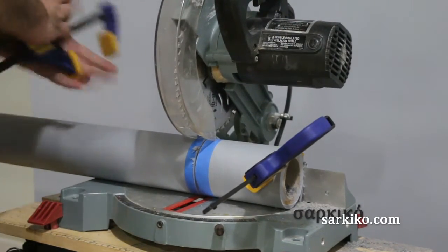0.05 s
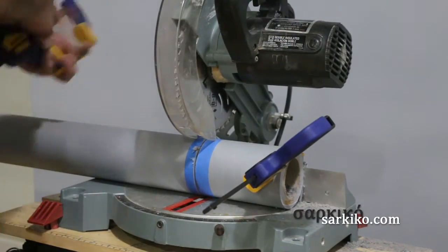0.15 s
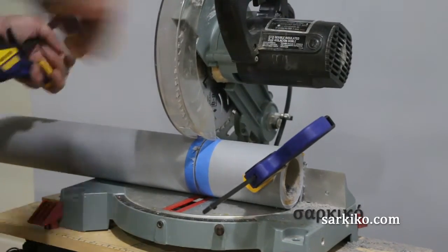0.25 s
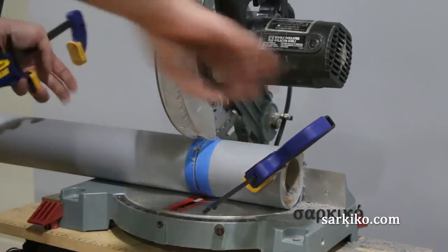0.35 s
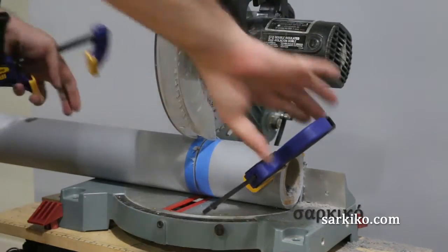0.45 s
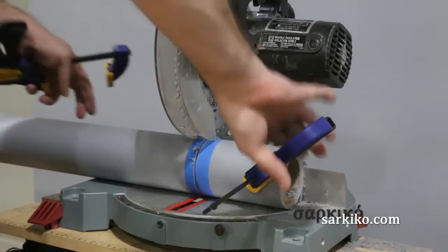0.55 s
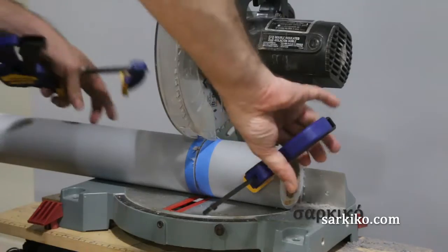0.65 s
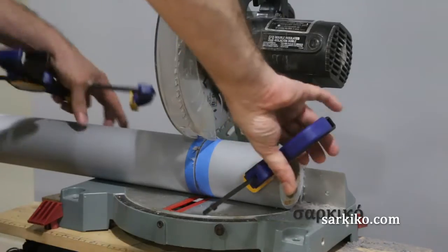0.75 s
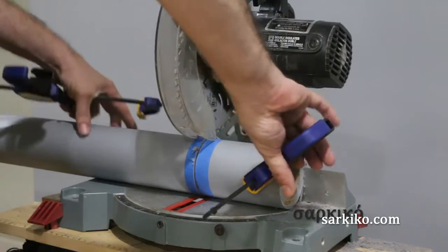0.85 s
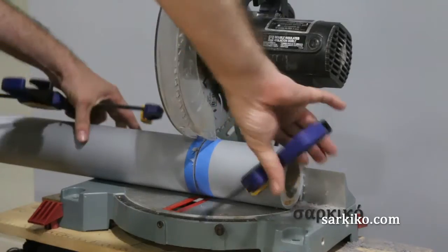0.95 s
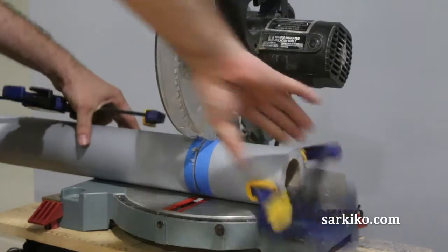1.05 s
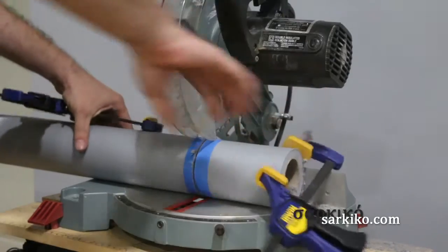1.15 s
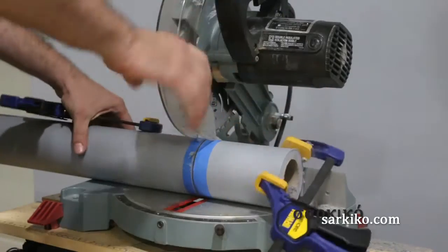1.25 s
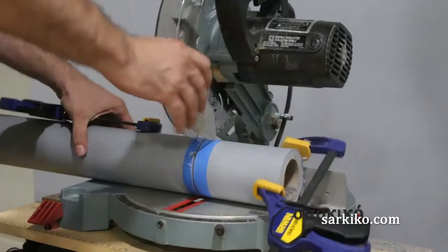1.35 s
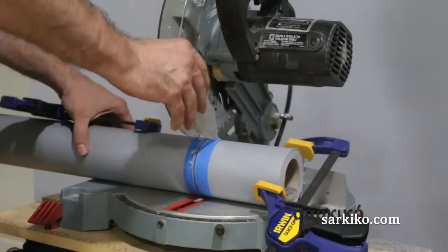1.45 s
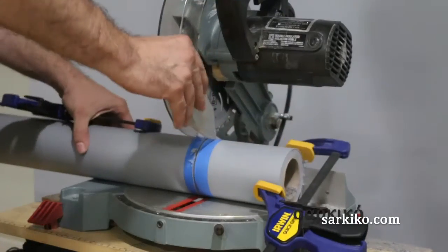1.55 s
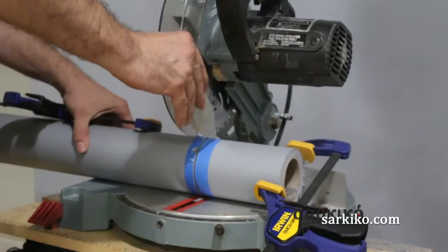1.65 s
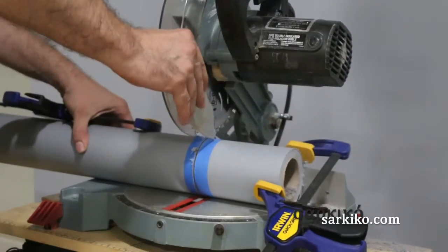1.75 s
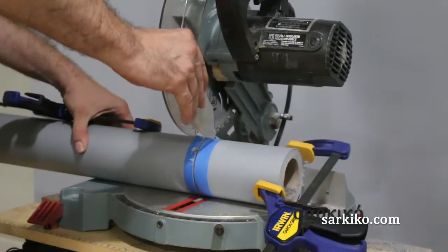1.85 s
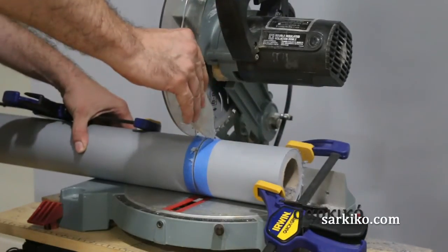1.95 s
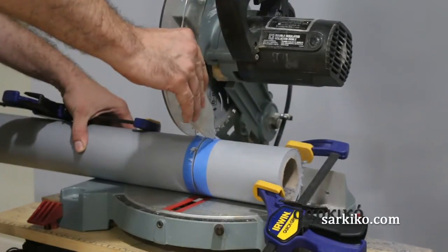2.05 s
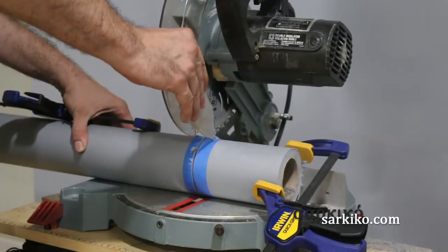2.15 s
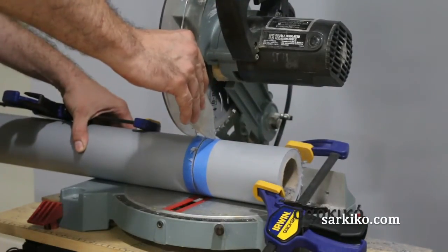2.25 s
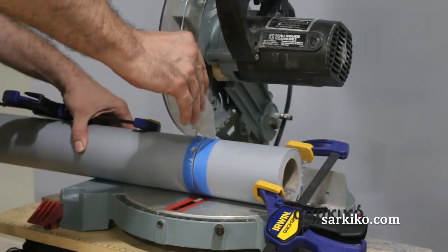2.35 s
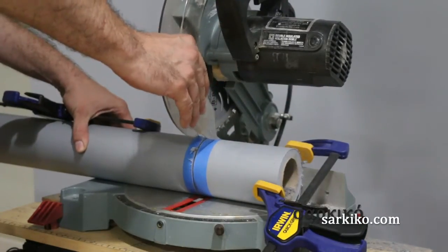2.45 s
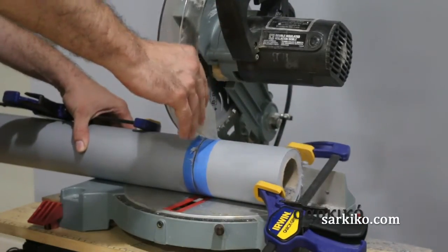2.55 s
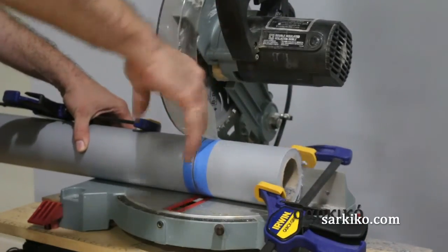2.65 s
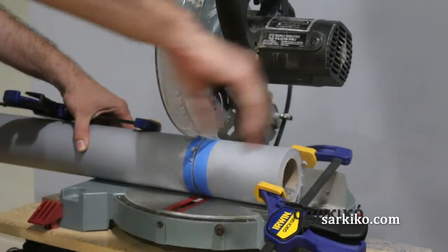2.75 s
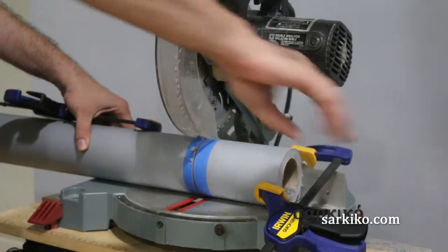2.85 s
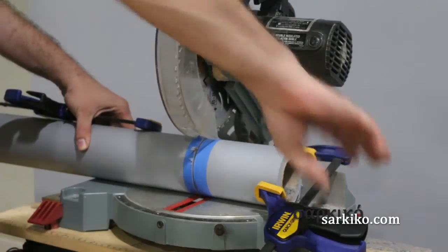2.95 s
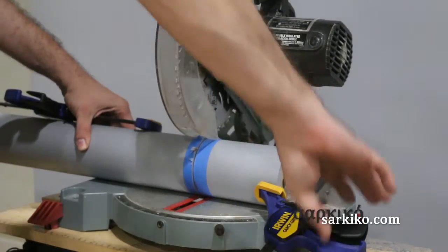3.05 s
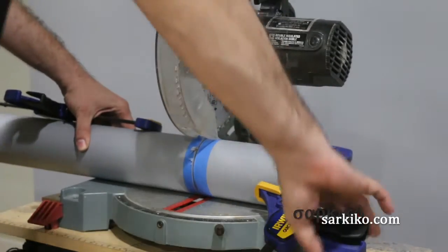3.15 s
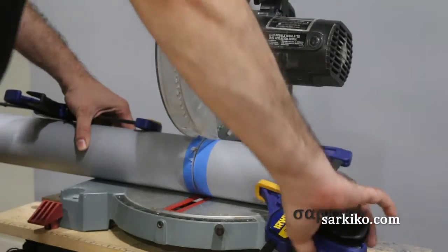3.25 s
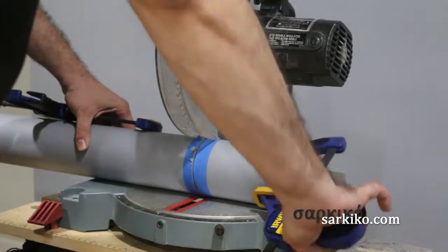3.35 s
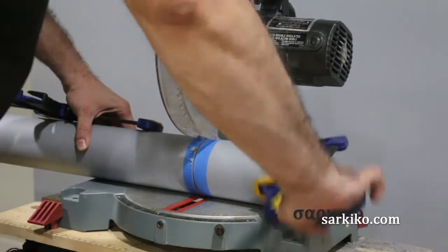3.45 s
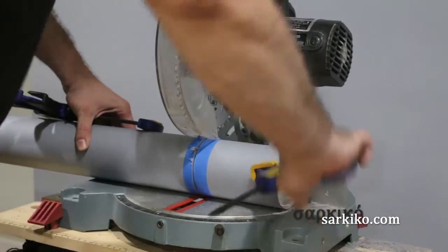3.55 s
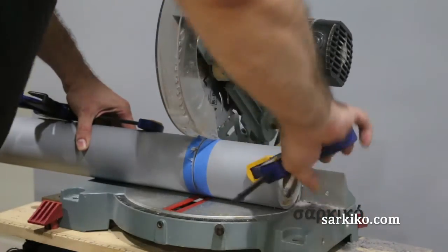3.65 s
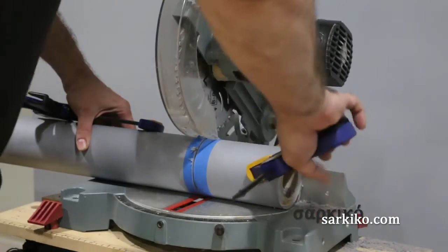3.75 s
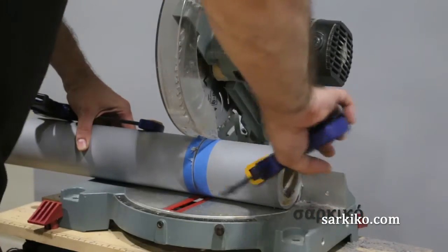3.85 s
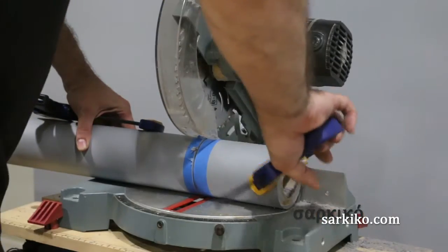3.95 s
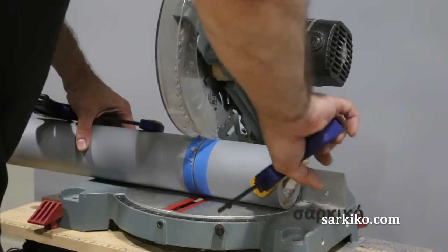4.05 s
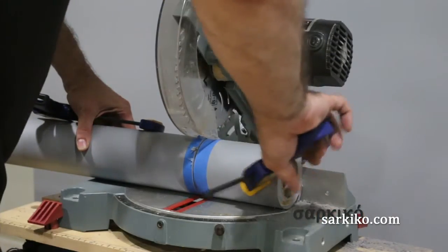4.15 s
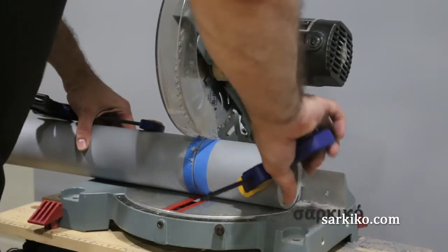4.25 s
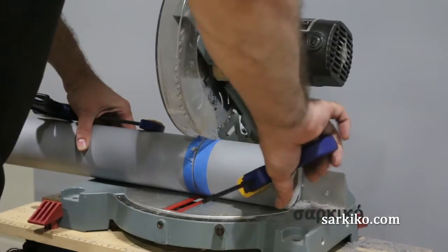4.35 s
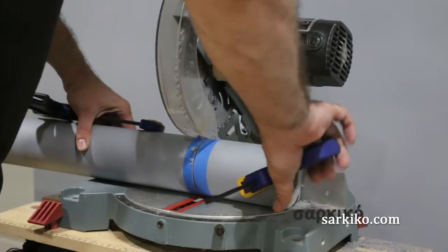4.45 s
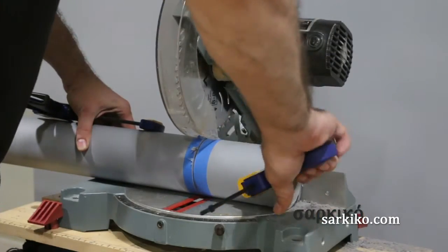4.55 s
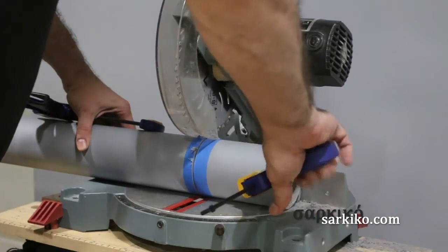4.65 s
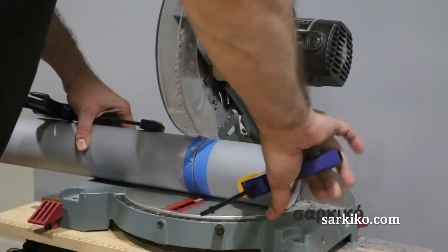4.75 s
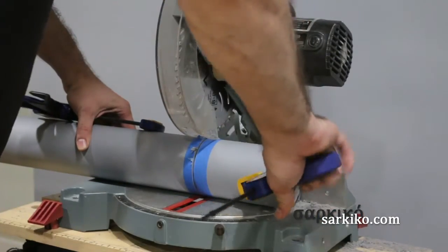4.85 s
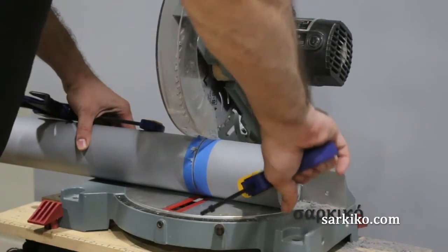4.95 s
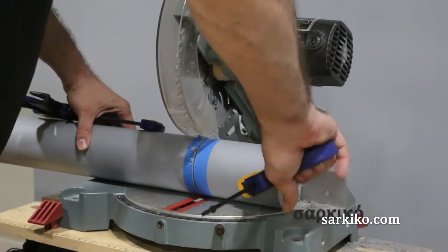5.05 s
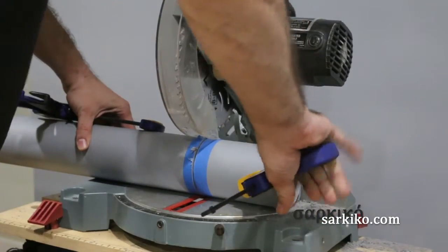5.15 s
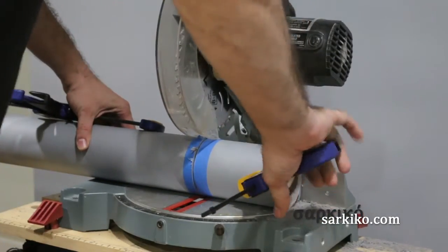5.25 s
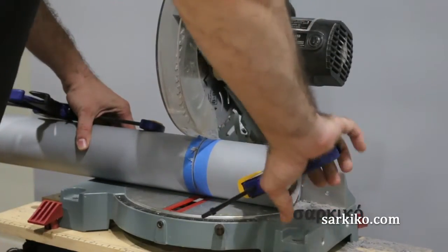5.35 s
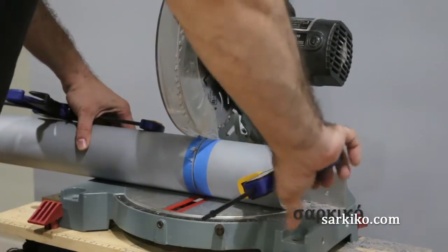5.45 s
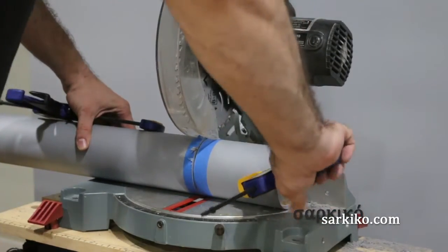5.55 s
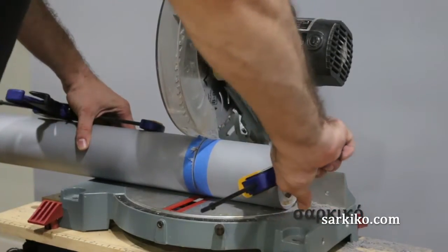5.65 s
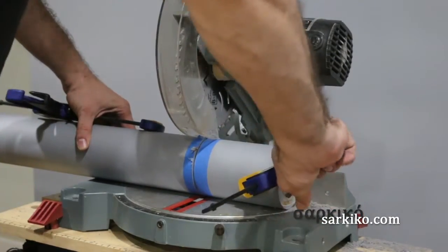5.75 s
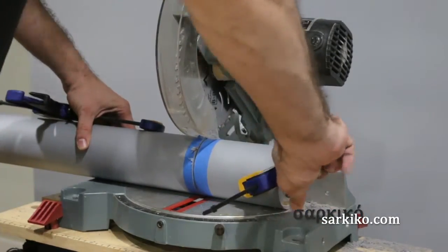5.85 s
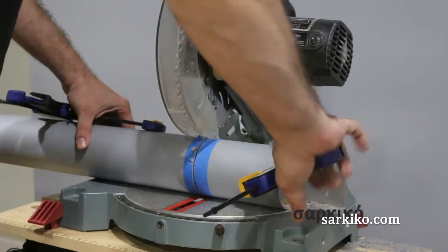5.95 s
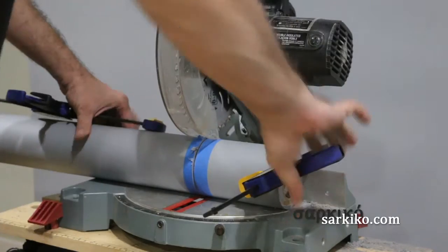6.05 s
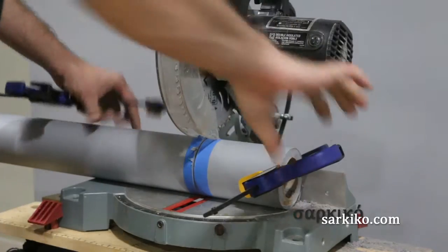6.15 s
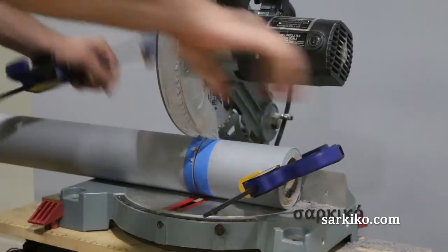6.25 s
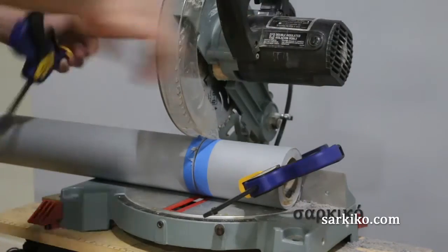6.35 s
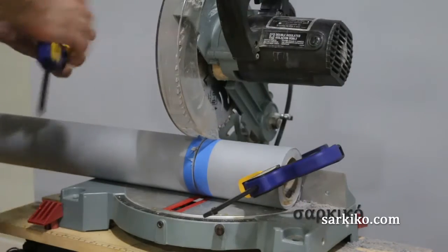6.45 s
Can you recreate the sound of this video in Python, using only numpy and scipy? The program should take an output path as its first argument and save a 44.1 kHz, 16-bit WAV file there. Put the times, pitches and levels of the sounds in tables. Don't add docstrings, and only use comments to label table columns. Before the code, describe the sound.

Close view of hands working plastic bar clamps on a hollow pipe. Light knocks come first, then a double clack and a loud clattering drop with fast bounces. Near silence holds with faint ticks, until jaws scrape and click again, one bright metallic snap bursts out, and softer ratchety clacks follow. The room is hard and lively, with soft steady background noise.

```python
import sys
import numpy as np
from scipy import signal
from scipy.fft import rfft, irfft
from scipy.io import wavfile

SR = 44100
rng = np.random.default_rng(int(sys.argv[2]) if len(sys.argv) > 2 else 0)


def boost_factor(decibels):
    exponent = np.asarray(decibels, float) / 20
    return 10 ** exponent


def transcribe(signal):
    frames = np.atleast_2d(signal).T
    limited = np.clip(frames, -1, 1)
    pcm = np.round(limited * 32767).astype(np.int16)
    wavfile.write(sys.argv[1], SR, pcm)


N = 285971

# start in seconds, peak level in dB, ring frequency in Hz,
# ring level in dB, crack level in dB.
KNOCKS = [(0.071, -28.5, 2200, -6, -2.5), (0.136, -24.5, 2530, 1.5, -9), (0.482, -26, 2620, -13, -9),
          (0.792, -12.5, 1526, -1, -10), (0.8198, -13, 2886, -5, -10.5), (1.077, -29, 2350, 4.5, -9),
          (1.1055, 8, 2578, -6, 1), (0.562, -45, 1960, 15.5, -18), (5.2037, -27.5, 2300, -6, -20),
          (1.215, -7, 1230, 3.5, 0.1), (1.4105, -12.5, 1800, -6, -22), (2.656, -42.5, 1093, 6, -29),
          (3.612, -21.5, 1880, 4.5, -40), (3.685, -20.5, 1440, -2, -33.5), (3.93, -19, 1594, 1, -4.5),
          (4.284, -27.5, 1700, -5.5, -33), (4.346, -0.5, 1900, 0.5, 8), (4.531, -25, 1010, -14, -9),
          (4.746, -21, 1040, -25, -8), (4.834, -13, 3630, -8, -31), (4.847, -16.5, 2020, 1.5, -8),
          (5.198, -17.5, 1770, -8.5, -16), (5.464, -21, 1870, -13, -34), (5.953, -15.5, 2850, -21, -12.5)]
# start in seconds, peak level in dB, ring frequency in Hz.
RATTLES = [
    (1.127, -4, 1300),
    (1.146, -4, 2474),
    (1.165, -6, 1460),
    (1.188, -7.5, 2000),
    (1.235, -17.5, 1620),
]
# start in seconds, peak level in dB, ring frequency in Hz.
TAPS = [(0.038, -46.5, 1680), (0.609, -45, 1950), (0.939, -32, 2470), (0.955, -33, 2330),
        (1.017, -45, 2340), (1.058, -37, 1490), (1.209, -11.5, 2540), (1.247, -41, 1240),
        (1.449, -29.5, 1800), (2.433, -43, 1660), (2.69, -46, 2500), (3.159, -50.5, 3440),
        (3.306, -37, 2000), (3.455, -43, 1270), (3.539, -37.5, 1280), (4.498, -29.5, 1780),
        (4.725, -43, 2030), (5.01, -45.5, 1770), (5.105, -44.5, 1800), (5.739, -44, 1200),
        (5.846, -42, 1650), (5.868, -45, 1750)]
# start in seconds, peak level in dB, chatter length in ms.
SLIPS = [
    (0.475, -41, 4),
    (2.495, -35, 4),
    (3.222, -40, 9.7),
    (3.323, -25.5, 12.5),
    (3.908, -36.5, 18),
    (4.188, -50, 3),
    (5.159, -31, 6.1),
    (5.621, -40, 6),
    (5.932, -31, 17),
]


def clamp_knocks(direct, send):
    rows = [(*row, 4.57) for row in KNOCKS]
    rows += [(*row, 8, -18.5, 4.2) for row in TAPS]
    rows += [(s, db, 2300, -32, -10, ms) for s, db, ms in SLIPS]
    rows += [(*row, 1, -18, 9.3) for row in RATTLES]
    for s, peak_db, ring_hz, ring_db, crack_db, chatter_ms in rows:
        start = s - .001
        body_force, ring_force = contact(chatter_ms, 0.41), contact(chatter_ms, 0.25)
        crack_force = contact(0.75 * chatter_ms, 1.0)
        strike(direct, send[0], plastic, body_force, peak_db - 5.5, start)
        strike(direct, send[1], lambda f: ring(f, ring_hz, 0.0091), ring_force, peak_db + ring_db - 5.0, start)
        strike(direct, send[2], brighten, crack_force, peak_db + crack_db - 5.5, start)


# frequency in Hz, level in dB, decay time T60 in seconds.
PIPE = [(102, -6.5, 0.35), (141.4, -33, 0.29), (216, 1, 0.091), (267.7, 4.5, 0.25), (362, 17.5, 0.024),
        (438.3, -2, 0.15), (543, 4, 0.044), (700, -1, 0.19)]
# start in seconds, peak level in dB, pitch in Hz.
THUMPS = [(0.628, -33.5, 266), (0.661, -39, 199), (0.795, -25, 275.8), (0.818, -29, 219), (0.956, -35, 275),
          (0.991, -40, 171), (1.33, -37, 124), (1.449, -32, 170), (1.441, -35.5, 80), (1.25, -29, 201),
          (1.598, -39, 214), (1.909, -50.5, 99.7), (2.432, -58, 245), (2.497, -38.5, 268),
          (2.72, -40.5, 110), (2.899, -41, 102), (3.34, -33.5, 88), (3.397, -39.5, 132), (3.614, -32, 253),
          (3.7, -27.5, 250), (3.932, -27, 285), (3.948, -25.5, 240), (4.059, -37, 84.4), (4.199, -39, 154),
          (4.397, -38, 227), (4.846, -29, 310), (4.9, -38, 100), (5.618, -45.5, 175), (5.949, -48, 54.3)]
# start in seconds, peak level in dB.
END_TOCKS = [(0.072, -37), (0.48, -37.5), (0.509, -52), (0.79, -20), (1.41, -34), (2.658, -26),
             (2.699, -39), (3.223, -39.5), (3.454, -34), (3.559, -33), (3.685, -26.5), (4.779, -33.5),
             (5.739, -48), (5.798, -38.5), (5.87, -41)]
# start in seconds, peak level in dB.
FLANK_TOCKS = [(0.071, -42), (0.643, -32.5), (0.793, -25), (1.019, -44.5), (1.213, -13.5), (1.279, -49),
               (2.504, -43), (2.66, -45), (3.329, -38), (3.93, -22.5), (3.995, -33.5), (5.239, -35.5),
               (5.899, -56), (5.953, -30), (5.989, -29)]
# start in seconds, peak level in dB.
WALL_TOCKS = [(0.139, -60), (0.499, -35), (0.794, -22.6), (0.829, -23), (1.1058, 0.6), (1.112, -1),
              (1.145, -11), (1.179, -9.5), (1.406, -43), (3.686, -23.5), (4.346, -42), (4.492, -27.5),
              (4.744, -27.5), (4.858, -26.5), (5.198, -28.5), (5.679, -40.5), (5.849, -37)]


def pipe_blows(direct, send):
    rows = [(*row, 8.8) for row in THUMPS]
    for tocks, mode_hz, ms in [(END_TOCKS, 470.5, 8.1), (FLANK_TOCKS, 705, 8.2), (WALL_TOCKS, 940, 12)]:
        for s, db in tocks:
            detune = 1 + 0.013 * rng.standard_normal()
            rows.append((s, db, mode_hz * detune, ms))
    for s, peak_db, pitch_hz, shove_ms in rows:
        def pipe(f):
            modes = sum(boost_factor(db - 18.5) * ring(f, hz, 0.57 * t60) for hz, db, t60 in PIPE)
            return band(ring(f, pitch_hz, 7.0 / pitch_hz) + modes, .62 * pitch_hz, 2.4 * pitch_hz)
        strike(direct, send[2], pipe, contact(shove_ms, 0.063), peak_db - 6.0, s - .0015)


# start in seconds, peak level in dB, ring frequency in Hz.
PLATES = [(1.1052, -13, 9970), (4.349, -6, 6050), (4.346, -20, 6800), (4.348, -18, 15100),
          (4.3475, -7, 1750), (4.85, -36, 8700), (4.495, -38, 5300), (4.748, -30, 3900),
          (5.198, -43, 10500), (5.465, -27.5, 3300), (1.1055, -20, 14000), (4.283, -36, 3700)]


def plate_zings(direct, send):
    for s, peak_db, hz in PLATES:
        strike(direct, send[1], lambda f: ring(f, hz, 0.0043), contact(2, .3), peak_db, s - .001)


# start in seconds, peak level in dB, length in ms.
TICKS = [(0.922, -39.5, 4.4), (1.6294, -56, 4.6), (1.9008, -49, 7.2), (2.5284, -47, 8.4),
         (2.5688, -42, 6.0), (2.5994, -51, 6.0), (2.864, -49, 6.4), (3.5248, -42, 5.6), (4.1303, -46.5, 12),
         (4.176, -43.5, 15), (5.079, -49, 6.8), (5.3486, -47, 4.6)]


def grit_ticks(direct, send):
    for s, peak_db, length_ms in TICKS:
        strike(direct, send[2], brighten, contact(length_ms, .4), peak_db + 0.5, s - .001)


def contact(ms, rise):
    t = np.arange(round(.15 * SR)) / SR
    length_s = np.clip(ms, .5, 60) / 1000
    noise, spikes = rng.standard_normal((2, len(t)))
    envelope = np.exp(-t / length_s) * (1 - np.exp(-t / (rise * length_s)))
    return noise * envelope * boost_factor(4.3 * spikes)


def strike(direct, send, colour, force, peak_db, s):
    bare = colour(np.arange(len(force)) == 0)
    sound = boost_factor(peak_db) * peak_one(signal.fftconvolve(force, bare)[:len(force)])
    add(direct, sound, s)
    add(send, bare * np.sqrt(np.sum(sound ** 2) / np.sum(bare ** 2)), s)


def plastic(f):
    return band(band(band(f, 1200, 18000), 1300, 8293), 1100, 3920)


def brighten(f):
    r = np.exp(-2 * np.pi * 5000 / SR)
    return signal.lfilter([(1 - r) ** 2], [1, -2 * r, r * r], band(f, 2400, 13000))


# frequency in Hz, level in dB, decay time T60 in seconds.
CLAMP = [(1040, -0.5, 0.045), (1770, 2.5, 0.045), (2410, 2, 0.044), (3300, -21, 0.011), (4410, -1, 0.01),
         (5370, -28.5, 0.0031)]
# start in seconds, length in seconds, level in dB.
DRAGS = [(0.56, 0.14, -35), (0.98, 0.018, -36), (1.27, .03, -38), (1.45, 0.064, -29), (2.58, 0.18, -43),
         (2.99, 0.18, -47.5), (3.39, 0.028, -29), (3.55, .22, -35), (4.2, 0.95, -46), (5.28, .05, -37.5),
         (5.66, 0.25, -42), (6.3, 0.23, -49)]
# start in seconds, length in seconds, level in dB.
SCRAPES = [
    (0.3, .1, -49),
    (0.85, .05, -55),
    (1.14, .03, -17),
    (1.45, 0.012, -17),
    (2.57, 0.046, -37),
    (3.25, 0.28, -31),
    (3.95, 0.28, -34.5),
    (4.58, 0.3, -34.5),
    (4.9, 0.31, -37),
    (5.66, 0.27, -33.5),
]
# start in seconds, length in seconds, level in dB.
BRUSHES = [
    (0.98, .05, -51),
    (1.27, .03, -48.5),
    (1.42, 0.22, -57),
    (2.55, 0.044, -51.5),
    (3.38, 0.12, -58),
    (3.95, 0.11, -55),
    (4.43, .03, -59),
    (5.1, 0.11, -62),
    (5.9, 0.15, -58.5),
]


def rubbing():
    rumble_db, scrape_db, hiss_db = strokes(DRAGS, -67), strokes(SCRAPES, -67), strokes(BRUSHES, -62.5)
    slow, fast = grains(120, 3.5), grains(700, 4.5)
    rumble = sum(boost_factor(db) * ring(slow, hz, 0.13 * t60) for hz, db, t60 in PIPE)
    body = sum(boost_factor(db) * ring(fast, hz, 0.15 * t60) for hz, db, t60 in CLAMP[:4])
    scrape = rms_one(body) + 1.3 * rms_one(band(fast, 400, 3200))
    hiss = band(grains(3100, 3.9), 3700, 11000)
    out = boost_factor(rumble_db - 20.0) * rms_one(rumble)
    out += boost_factor(scrape_db - 26.5) * rms_one(scrape)
    return out + boost_factor(hiss_db - 11) * rms_one(hiss)


def grains(per_s, spread_db):
    sizes = boost_factor(spread_db * np.minimum(rng.exponential(1, N), 4)) * rng.choice([-1, 1], N)
    return sizes * (rng.random(N) < per_s / SR)


def strokes(rows, idle_db):
    swell_db_s, fade_db_s = 149, 110.5
    t = np.arange(0, N, 64) / SR
    s, length_s, db = np.transpose(rows)[:, :, None]
    level = db - swell_db_s * np.maximum(s - t, 0) - fade_db_s * np.maximum(t - s - length_s, 0)
    return np.interp(np.arange(N) / SR, t, np.maximum(level.max(axis=0), idle_db))


# frequency in Hz, level in dB, decay time T60 in seconds.
BLADE = [(463, -29, .8), (560, -41, 2.2), (958, -46, .5), (1098, -48, .5)]


def blade():
    click = np.zeros(N)
    click[round(1.11 * SR)] = 1
    return sum(boost_factor(db) * ring(click, hz, t60) for hz, db, t60 in BLADE)


# start in seconds, length in seconds, frequency in Hz, level in dB.
HOLLOW = [
    (1.854, 0.26, 594, -64.5),
    (1.915, 0.13, 406, -61),
    (0.545, .07, 10700, -66),
    (2.961, 0.27, 434, -57),
    (5.795, 0.49, 432, -60.5),
]


def hollow():
    out = np.zeros(N)
    for s, length_s, hz, db in HOLLOW:
        noise = rng.standard_normal(SR // 2)
        tone = ring(ring(noise, hz, 0.26), hz, 0.18)[:round(length_s * SR)]
        add(out, boost_factor(db) * rms_one(tone) * np.sqrt(np.hanning(len(tone))), s)
    return out


# frequency in Hz, decay time T60 in seconds, level in dB.
ROOM = [(105, 0.32, 2), (287, 0.29, 1.5), (810, 0.33, 2.5), (2000, 0.3, 0.5), (4287, 0.35, -3.5),
        (10800, 0.35, -3), (14890, 0.1, 5)]
# delay in ms, level in dB.
ECHOES = [(6.3, -7.5), (9.5, -16.5), (14.0, -15)]


def workshop(direct, send):
    t = np.arange(round(.9 * SR)) / SR
    edges = 45 * 2 ** np.arange(0, 9, .5)
    white = rng.standard_normal((2, len(send), len(t)))
    tails = 0
    for k, (low, high) in enumerate(zip(edges, edges[1:])):
        hz = np.sqrt(low * high)
        decay_db = at_hz(ROOM, hz, column=2) - 60 * t / at_hz(ROOM, hz)
        tails = tails + band(white[k % 2], low, high) * boost_factor(decay_db)
    tails *= 1 - np.exp(-t / 0.0081)
    tails *= boost_factor(-1.5) / np.sqrt(np.sum(tails ** 2) / len(send))
    out = direct + signal.fftconvolve(send, tails, axes=1)[:, :N].sum(axis=0)
    for k, (ms, db) in enumerate(ECHOES):
        add(out, boost_factor(db) * (-1) ** k * direct, ms / 1000)
    return out


# frequency in Hz, level in dB per Hz.
AIR = [(13, -37.5), (22, -1.5), (122, -0.5), (387, -5.5), (457, -6.5), (554, -4), (653, -10.5), (988, -8.5),
       (1170, -11), (2200, -14), (8970, -23), (14700, -29.5), (16000, -37.5)]


def air():
    return boost_factor(-55) * rms_one(shaped(rng.standard_normal(N), AIR))


def ring(force, hz, t60):
    r, w = boost_factor(-60 / (t60 * SR)), 2 * np.pi * hz / SR
    return signal.lfilter([0, np.sin(w)], [1, -2 * r * np.cos(w), r * r], force + 1e-18)


def band(x, low_hz, high_hz):
    return signal.sosfilt(signal.butter(2, [low_hz, high_hz], "band", fs=SR, output="sos"), x)


def shaped(x, points):
    hz = np.maximum(np.arange(len(x) // 2 + 1) * SR / len(x), 1)
    return irfft(rfft(x) * boost_factor(at_hz(points, hz)), len(x))


def at_hz(points, hz, column=1):
    points = np.array(points)
    return np.interp(np.log(hz), np.log(points[:, 0]), points[:, column])


def rms_one(x):
    return x / np.sqrt(np.mean(x ** 2) + 1e-20)


def peak_one(x):
    return x / (np.max(np.abs(x)) + 1e-20)


def add(track, sound, s):
    i = round(s * SR)
    track[i:i + len(sound)] += sound[:N - i]


def scene():
    direct, send = np.zeros(N), np.zeros((3, N))
    clamp_knocks(direct, send)
    pipe_blows(direct, send)
    grit_ticks(direct, send)
    plate_zings(direct, send)
    rub = rubbing()
    room = workshop(direct + rub, send + rub / np.sqrt(len(send)))
    return (room + blade() + hollow() + air())[None]


def roll_off(x):
    return signal.sosfilt(signal.butter(12, 16410, fs=SR, output="sos"), x)


def record(dry):
    limit_db, recover_db_s, duck_s = -7, 70.5, 0.0065
    heard = signal.sosfilt(signal.butter(1, 45, "high", fs=SR, output="sos"), dry)
    t = np.arange(N) / SR
    over_db = np.maximum(20 * np.log10(np.abs(heard[0]) + 1e-9) - limit_db, 0)
    held_db = np.maximum.accumulate(over_db + recover_db_s * t) - recover_db_s * t
    held_db = np.maximum(held_db, 0)
    r = np.exp(-1 / (duck_s * SR))
    ducked = heard * boost_factor(-.8 * signal.lfilter([1 - r], [1, -r], held_db))
    top_cut = signal.cheby2(10, 35, 16150, fs=SR, output="sos")
    mix = np.clip(signal.sosfilt(top_cut, np.clip(ducked, -1, 1)), -1, 1)
    return roll_off(mix)


dry = scene()
out = record(dry)
transcribe(out)
```